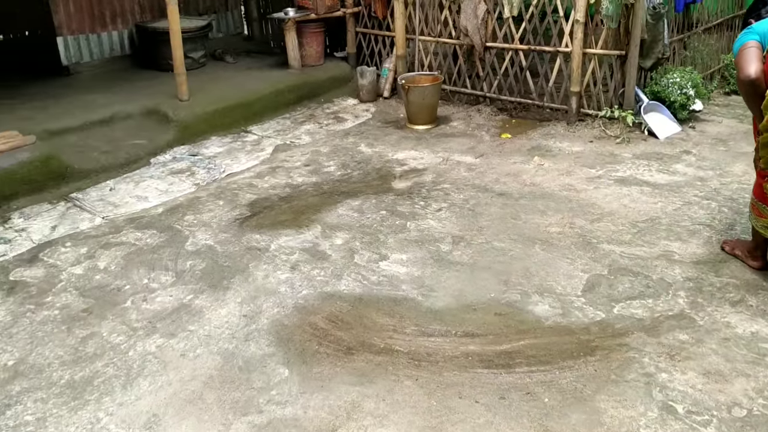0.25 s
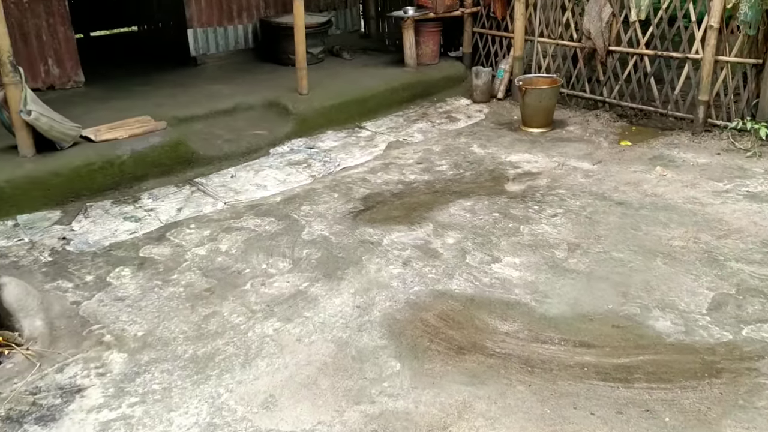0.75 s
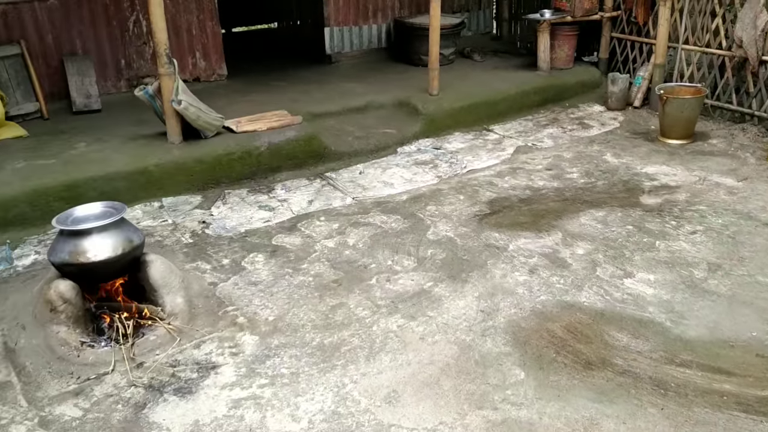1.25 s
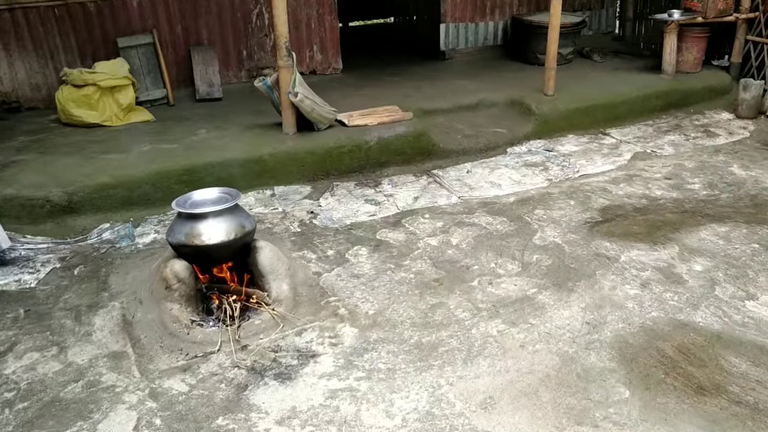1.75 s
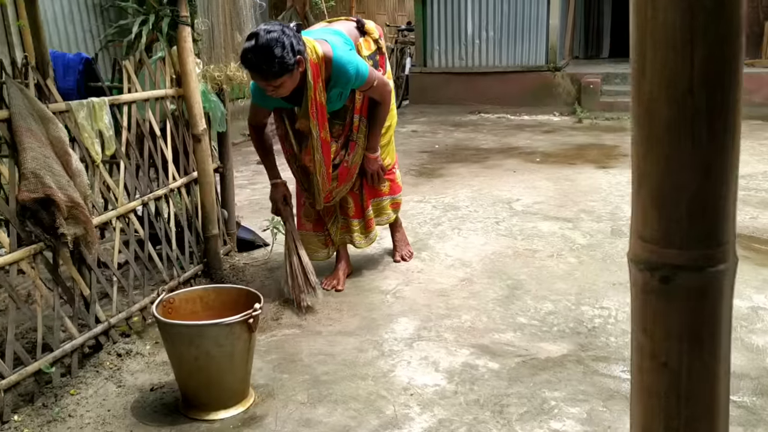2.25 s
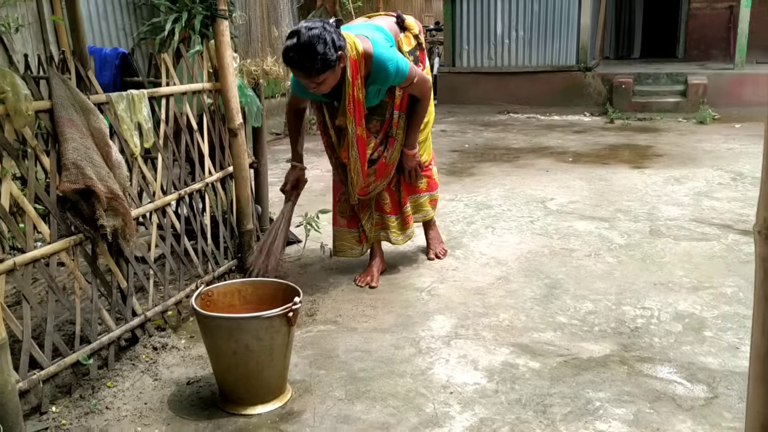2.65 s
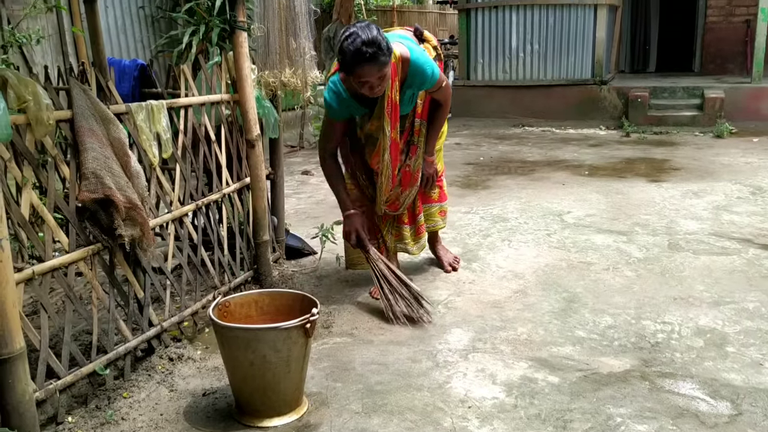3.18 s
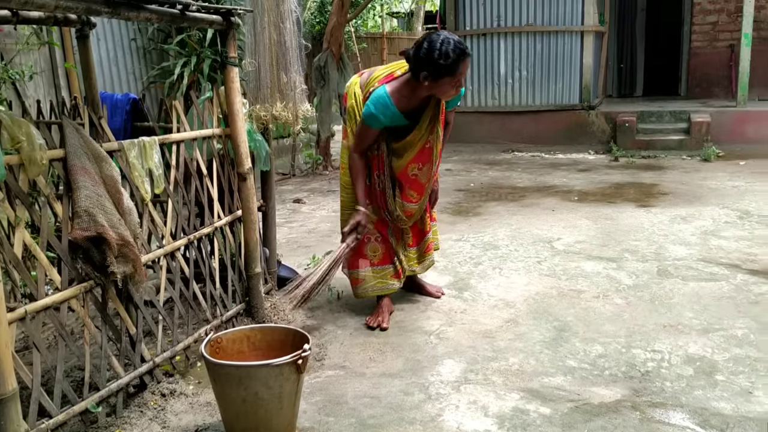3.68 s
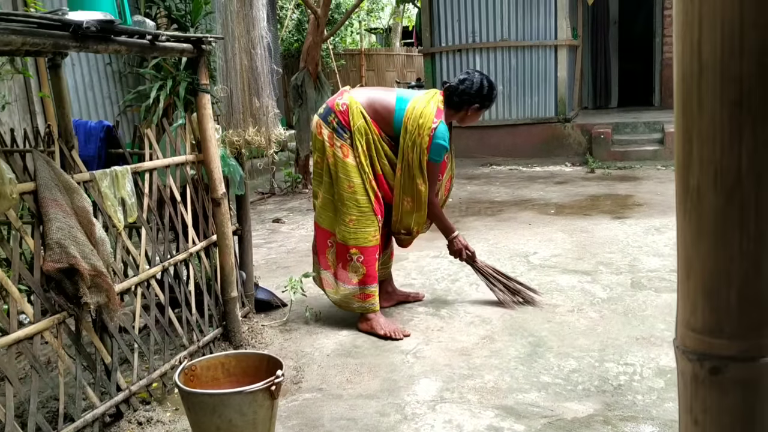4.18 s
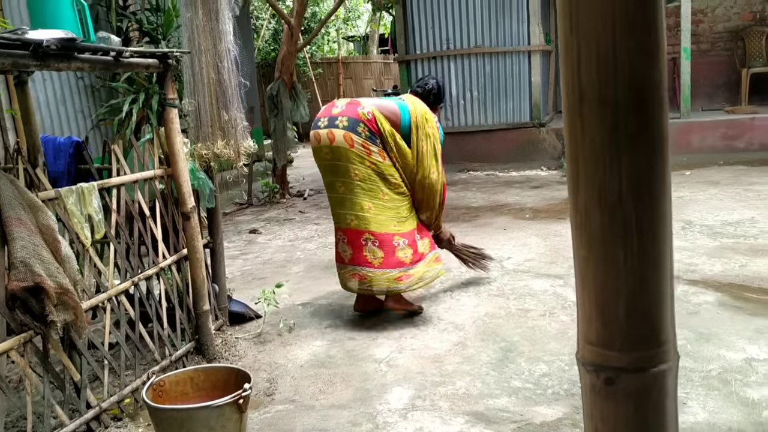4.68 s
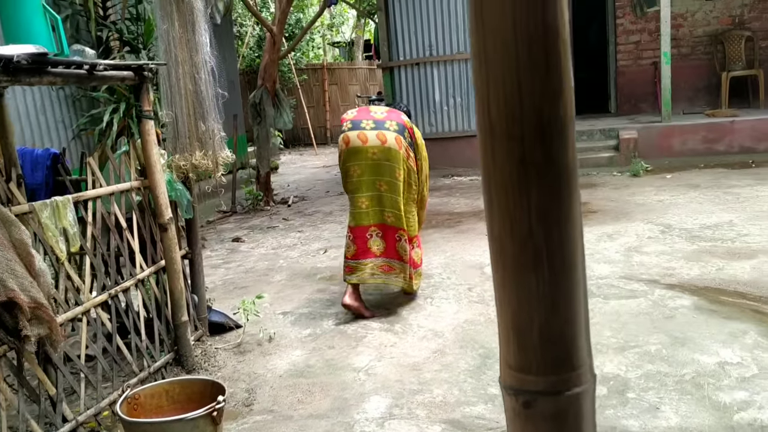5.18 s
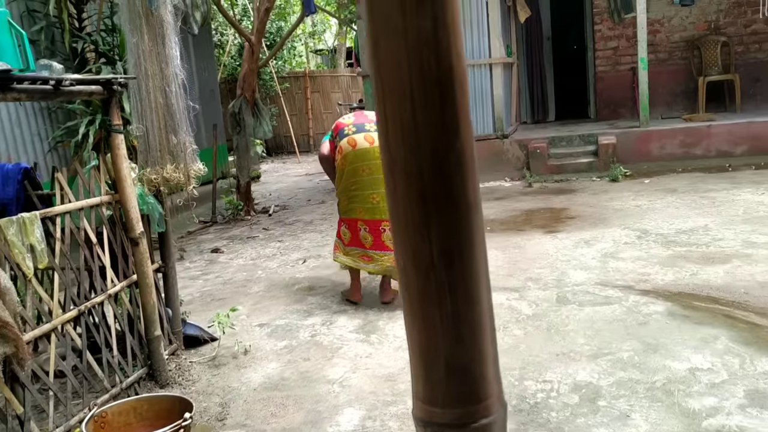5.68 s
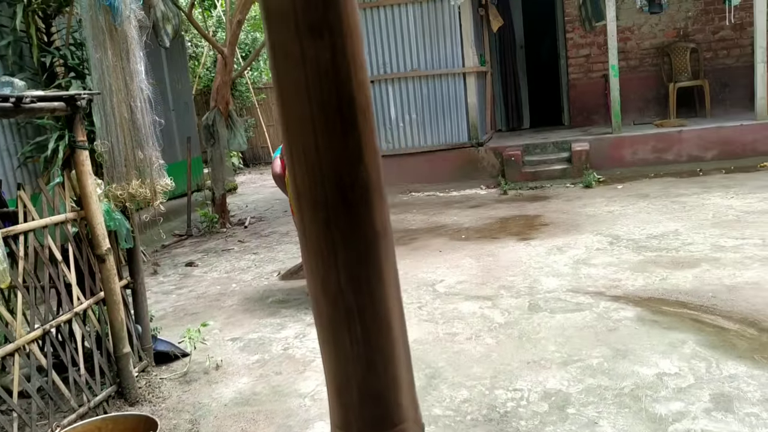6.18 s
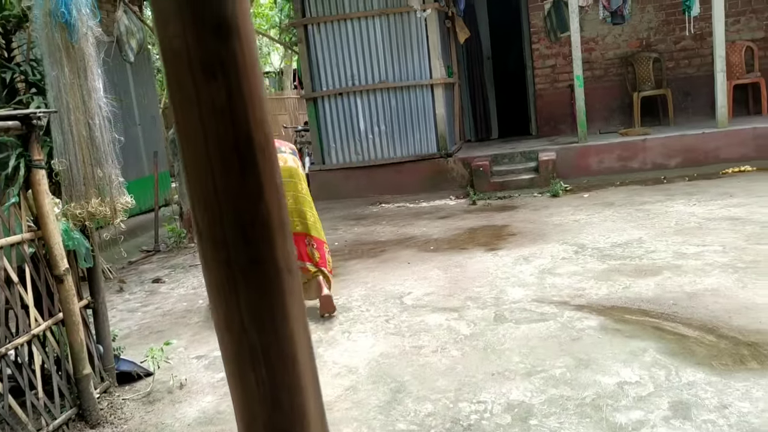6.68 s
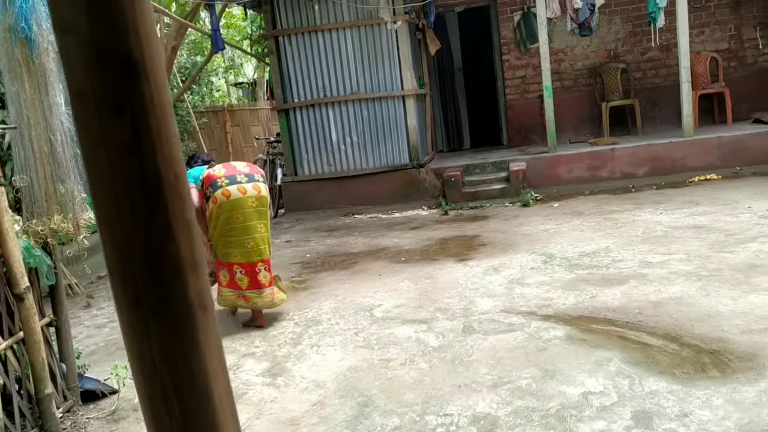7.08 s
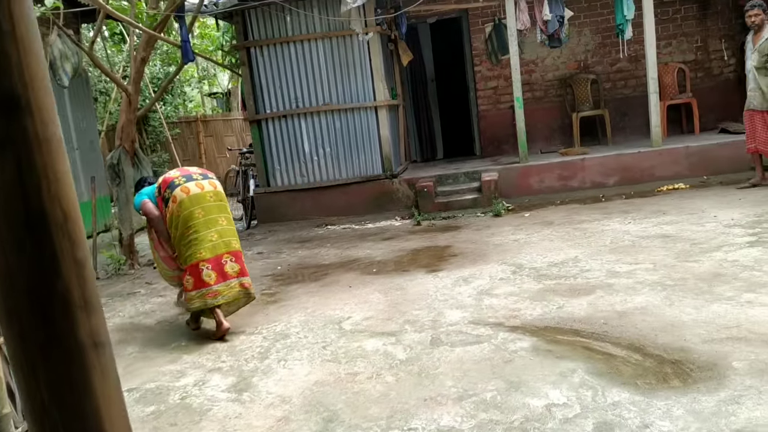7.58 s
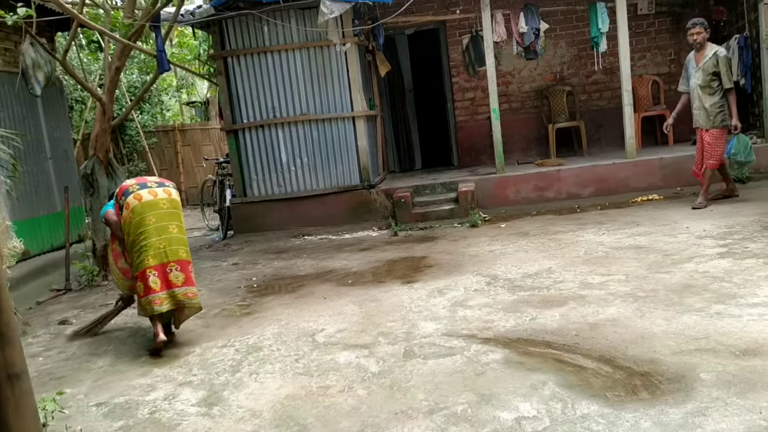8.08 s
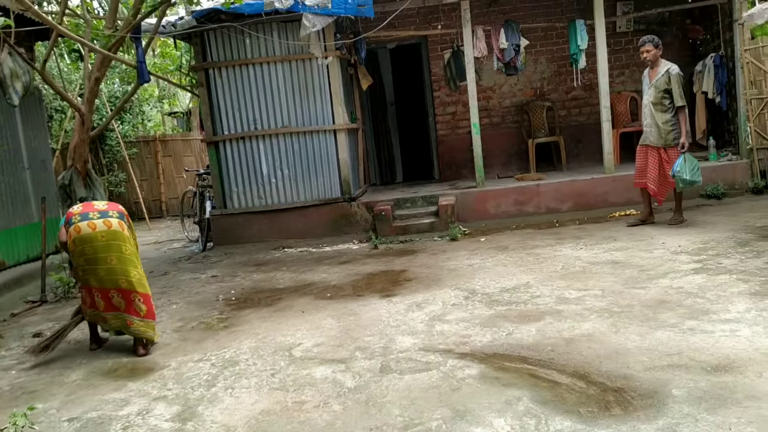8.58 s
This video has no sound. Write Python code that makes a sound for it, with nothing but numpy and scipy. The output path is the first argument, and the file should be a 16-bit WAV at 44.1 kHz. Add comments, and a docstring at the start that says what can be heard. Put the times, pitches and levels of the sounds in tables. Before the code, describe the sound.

Dry, scratchy swishes of a twig broom cross a gritty outdoor yard, heard in stereo from a few metres away, with occasional crisp snaps. Two quick pops from a cooking fire come first, then a distant wooden thud, one foot scrape and later another thud. A faint far motor rises in pitch at the close. Small birds, a thin insect buzz and a low village rumble sit quietly behind the sweeping.

```python
"""A short stick broom sweeps a hard village yard to and fro, a few metres from a hand-held phone with
two microphone ports. Its twig tips skip over grit in dense ticks that merge into a hiss, and twigs snap.
Birds chirp near and far, a cooking fire pops twice, something wooden thuds behind the houses and a foot
drags once. Late on, a far motor speeds up. Insects buzz thinly over a low village rumble throughout."""
import sys
import numpy as np
from scipy import signal
from scipy.fft import rfft, irfft, next_fast_len
from scipy.io import wavfile

SR = 44100
rng = np.random.default_rng(int(sys.argv[2]) if len(sys.argv) > 2 else 0)


def to_wav(sig):
    """Store sig (one row per channel, or 1-D mono) as 16-bit WAV at the path in sys.argv[1].

    Samples outside -1..1 are clipped; the rate is SR.
    """
    pcm = np.clip(np.atleast_2d(sig), -1, 1) * 32767
    pcm = np.round(pcm).astype(np.int16)
    wavfile.write(sys.argv[1], SR, pcm.T)  # frames by channels


N = 389826


def undb(db):
    return 10 ** (np.asarray(db) / 20)


def level(x, db):
    """Scale to an RMS level."""
    return x * undb(db) / np.sqrt(np.mean(x ** 2))


def curves(table):
    """Columns of a timed table as sample-by-sample lines."""
    times, *columns = np.transpose(table)
    return [np.interp(np.arange(N) / SR, times, column) for column in columns]


def ring(x, hz, width_hz):
    """Two-pole resonance, gain 1 at the centre."""
    return signal.lfilter(*signal.iirpeak(min(hz, .45 * SR), hz / width_hz, SR), x)


def walk(per_s):
    """Random levels joined by straight lines; spread near 1."""
    k = int(per_s * N / SR) + 2
    return 1.25 * np.interp(np.linspace(0, k - 1, N), np.arange(k), rng.standard_normal(k))


def colour(x, spectrum):
    """Shape the spectrum along straight lines on a log-frequency axis."""
    hz, db = np.transpose(spectrum)
    size = next_fast_len(N)
    gain_db = np.interp(np.log(np.fft.rfftfreq(size, 1 / SR) + 1), np.log(hz), db)
    return irfft(rfft(x, size) * undb(gain_db), size)[..., :N]


def add(out, s, sound, pan_db):
    """Mix a sound in at s seconds, pan_db louder at the left port than at the right."""
    i = int(s * SR)
    out[:, i:i + sound.shape[-1]] += sound[..., :N - i] * undb([[pan_db / 2], [-pan_db / 2]])


def yard(x, t60, wet_db, hold_s):
    """House fronts and fence return a diffuse tail that keeps changing, its bass alike at both ports."""
    t, hop = np.arange(int(t60 * SR)) / SR, int(hold_s * SR / 2)
    out = np.pad(x, ((0, 0), (0, 2 * hop + len(t))))
    fade = np.hanning(2 * hop)
    for i in range(-hop, N, hop):
        mid, side = rng.standard_normal((2, len(t))) * 1000. ** (-t / t60) * (t > .003)
        side = signal.lfilter(*signal.butter(1, 500, "high", fs=SR), side)
        tail = undb(wet_db) * np.array([mid + side, mid - side]) / np.sqrt(np.sum(mid ** 2 + side ** 2))
        a, b = max(i, 0), min(i + 2 * hop, N)
        out[:, a:b + len(t) - 1] += signal.fftconvolve(x[:, a:b] * fade[a - i:b - i], tail, axes=1)
    return out[:, :N]


def grit(per_s, spread_db, patchy_db):
    """Stick-slip ticks on the ground; each reaches the two ports from its own spot with its own lag."""
    # where the broom is: (time [s], lag of the left port behind the right [ms])
    bearing = [(0, -.27), (2.9, -.33), (3.2, .14), (5.5, .16), (8.84, .2)]
    when, spot, polarity, strength = rng.random((N // 4, 4))[:int(per_s * N / SR)].T
    at = when * (N - 60) + 30
    lag_ms = np.interp(at / SR, *np.transpose(bearing)) + .12 * (2 * spot - 1)
    half_lag = lag_ms * SR / 2000
    # many small slips, few large ones, none beyond what a twig can store
    size = np.sign(polarity - .5) * undb(spread_db * np.minimum(-np.log(1 - strength), 6.5))
    ticks = np.array([np.bincount((at + side * half_lag).astype(int), size, N) for side in (1, -1)])
    return ticks * undb(patchy_db * walk(90))


def stroke_speed(t, rise, hold, fall, touch_db, lean_db):
    """The bundle lands, speeds up, holds and lifts off; grit settles after it."""
    landing, start = np.clip(t / .004, 0, 1), undb(touch_db)
    speed_up = np.sin(np.pi / 2 * np.clip(t / max(rise, .002), 0, 1)) ** 2.38
    lean = undb(lean_db * np.clip((t - rise) / max(hold, .001), 0, 1))
    lifted = np.maximum(t - rise - hold, 0) / max(fall, .005)
    # the hiss drops 20 dB during lift-off, then settling grit fades more slowly
    fade = np.minimum(lifted ** 1.05, 1 + .7 * (lifted - 1))
    return landing * (start + (1 - start) * speed_up) * lean * 10 ** -fade


def broom():
    """A few metres off, tips hiss, twigs ring at shifting pitches and the bundle rasps on the ground."""
    # strokes and scuffs: (touch-down [s], speed-up [s], full speed [s], lift-off [s], tip hiss [dB],
    # touch-down against full speed [dB], lean during full speed [dB], twigs over hiss [dB],
    # rasp over hiss [dB], hiss left minus right [dB])
    strokes = [(-0.2, 0.15, 0.038, 0.13, -42, -17.5, 0.5, -10.5, -17.5, 3),
               (0.11, 0.045, 0.13, 0.1, -66, -6, -1.5, -5, -13, 5),
               (0.276, 0.064, 0.04, 0.12, -61.5, -9, -1, -9, -13, 8),
               (0.407, 0.17, 0.13, 0.13, -42.5, -15.5, -0.1, -12, -18.5, 1.3),
               (1.079, 0.031, 0.015, 0.073, -54.5, -6, -0.5, -12, -11, 1.5),
               (1.145, 0.2, 0.19, 0.16, -41, -12.5, -4.5, -13.5, -18, 1.5),
               (1.986, 0.19, 0.075, 0.095, -44.5, -5, -2, -15.5, -16.5, 1.5),
               (2.3, 0.03, 0.1, 0.12, -71, -1, -6, -2, -16, 2),
               (2.472, 0.12, 0.15, 0.3, -47, -12, 3.5, -14, -17, 1),
               (3.049, 0.032, 0.013, 0.051, -60.5, -10, 14, -11, -30, -5),
               (3.099, 0.068, 0.057, 0.067, -42.5, -6.5, 2, -12, -20, -2.4),
               (3.25, 0.024, 0.08, 0.1, -55, -8, -2, -7, -8.5, -1),
               (3.37, 0.015, 0.004, 0.039, -53, 3, 1, -12, -7.5, 1),
               (3.4, 0.024, 0.062, 0.17, -37, -16, 1.5, -13.5, -20.5, -2.5),
               (3.729, 0.49, 0.065, 0.093, -39.5, -18, -2, -13, -22, -4.5),
               (4.215, 0.018, 0.02, 0.13, -45.5, -12, -8, -20, -23, -0.5),
               (4.327, 0.033, 0.061, 0.12, -37, -17, 1, -15, -25.5, -2.5),
               (4.716, 0.23, 0.13, 0.14, -39, -19, -3.5, -14, -20, -2),
               (5.126, 0.0055, 0.002, 0.03, -51, -8.0, -0.5, -2, -2.5, -1.5),
               (5.41, 0.087, 0.089, 0.12, -44.5, -11, 1, -10.5, -15.5, -0.8),
               (5.83, 0.044, 0.011, 0.3, -53, -12.5, -0.5, -13, -17, -1),
               (5.938, 0.17, 0.034, 0.15, -38.5, -19, -3.5, -13, -13, -0.6),
               (6.445, 0.25, 0.046, 0.086, -38, -17, -2.2, -13, -17.5, -0.6),
               (6.794, 0.01, 0.003, 0.041, -50.5, -6.5, 0, -24, -27, 2.1),
               (6.903, 0.004, 0.004, 0.037, -58.5, -4, -1, 6, -11, 0),
               (7.071, 0.16, 0.14, 0.16, -40, -18.5, 1, -11.5, -17, -0.5),
               (7.48, 0.028, 0.0073, 0.15, -51, -5, -4, -9, -8, 1),
               (7.661, 0.026, 0.0098, 0.038, -58, -12, -7, -11, -15, 1.9),
               (7.748, 0.027, 0.031, 0.026, -54.5, -15.2, -2, -3, -23, 1),
               (7.809, 0.092, 0.22, 0.19, -38, -8.5, -2.5, -10.5, -19, -1),
               (7.99, 0.034, 0.15, 0.071, -38.5, -12, -2, -24, -18, 0.5),
               (8.487, 0.013, 0.0027, 0.08, -50.5, -21, -1.5, -8, -21, -2.7),
               (8.548, 0.1, 0.1, 0.1, -40.5, -10, -0.8, -12.5, -20.5, -1),
               (8.72, 0.13, 0.092, 0.055, -35.5, -9.5, 0, -12.5, -15, -0.5)]
    # spectrum of the fine tips: (frequency [Hz], gain [dB])
    tip_spectrum = [(3240, -16.5), (5500, -9), (7160, -1), (10900, 2.5), (14700, -1), (15500, 1.5)]
    # spectrum of the twig bodies: (frequency [Hz], gain [dB])
    twig_spectrum = [(1240, -21), (2100, -6.5), (3340, 4.5), (4450, 3.5), (5300, -5), (6500, -6),
                     (8450, 3.5), (14300, -120)]
    # spectrum of the ground rasp: (frequency [Hz], gain [dB])
    rasp_spectrum = [(410, -10.5), (700, -8.5), (843, -4), (1160, -6.5), (2400, 1.5), (3120, 0),
                     (5280, -120)]
    # loose twigs rustle between strokes
    hiss_power, twig_power, rasp_power = (undb(2 * (db + 3.5 * walk(14))) for db in (-70, -72, -72))
    t, hiss_power = np.arange(N) / SR, np.array([hiss_power, hiss_power])
    for s, rise, hold, fall, db, touch_db, lean_db, twig_db, rasp_db, pan_db in strokes:
        at = slice(max(int(s * SR), 0), int((s + 1.5) * SR))
        power = stroke_speed(t[at] - s, rise, hold, fall, touch_db, lean_db) ** 2
        hiss_power[:, at] += undb(2 * db + np.array([[pan_db], [-pan_db]])) * power
        # twigs and rasp follow speed less steeply than the hiss
        twig_power[at] += undb(2 * (db + twig_db)) * power ** .75
        rasp_power[at] += undb(2 * (db + rasp_db)) * power ** .83
    ticks = grit(per_s=9000, spread_db=1.4, patchy_db=.8)
    fine, body = colour(ticks, tip_spectrum), colour(ticks, twig_spectrum)
    # each twig rings at its own pitch while it touches down, so the colour keeps shifting
    tips = sum(undb(2.13 * walk(50)) * ring(fine, hz, hz / 14) for hz in np.geomspace(5000, 16000, 18))
    twigs = sum(undb(3 * walk(45)) * ring(body, hz, hz / 18) for hz in np.geomspace(2200, 6500, 20))
    rasp = level(colour(grit(per_s=2500, spread_db=2, patchy_db=1.5), rasp_spectrum), 0)
    rasp *= undb([[1.5], [-1.5]])  # the left port lies nearer the ground
    # single stiff twigs catch and let go
    flicks = ring(grit(per_s=500, spread_db=2.6, patchy_db=3), hz=9000, width_hz=9000)
    hiss = np.sqrt(hiss_power) * (level(tips, 0) + level(flicks, -15))
    return hiss + np.sqrt(twig_power) * level(twigs, 0) + np.sqrt(rasp_power) * rasp


def village():
    """The village all around: half-octave bands of noise flicker separately while the bass swells."""
    # spectrum of the background: (frequency [Hz], gain [dB])
    spectrum = [(12, -60), (20, 0), (72, 2.5), (282, -14), (465, -20.5), (857, -22), (1500, -28.5),
                (2610, -29), (4550, -56), (4950, -34), (7110, -30), (8170, -19), (9130, -29),
                (10800, -30.5), (15500, -36)]
    # swell of the low rumble, taken about its mean: (time [s], level [dB])
    rumble = [(0.0, -64), (2.04, -61.5), (2.58, -65), (3.42, -59.5), (5.34, -60), (5.96, -59.5),
              (6.28, -56.5), (6.75, -62), (7.04, -58.5), (7.31, -62), (7.98, -60), (8.84, -58)]
    mid, side = colour(rng.standard_normal((2, N)), spectrum)
    swell_db = curves(rumble)[0]
    swell_db -= swell_db.mean()
    out = 0
    for hz in 25 * 2 ** np.arange(0, 9.4, .5):
        # light wind stirs each port alone at the very bottom; the treble is diffuse
        apart = min(max(.18, 15 / hz, hz / 950), 1) * np.array([[1], [-1]])
        gain_db = 1.7 * walk(5.5) + swell_db * (hz < 160)
        out += undb(gain_db) * ring(mid + apart * side, hz, hz / 3)
    return level(out, -56)


def insects():
    """A thin, high buzz: a narrow band of noise that wavers in level."""
    band = signal.butter(3, [7520, 8330], "band", fs=SR, output="sos")
    buzz = signal.sosfilt(band, rng.standard_normal((2, N)))
    return undb(2.4 * walk(3)) * level(buzz, -70.5)


def bird_note(hz, rise, length_s, rasp_hz):
    """A gliding sine with soft edges, roughened by a fluttering throat."""
    progress = np.arange(int(length_s * SR)) / (length_s * SR)
    k = int(2 * rasp_hz * length_s) + 2
    flutter = np.interp(progress * (k - 1), np.arange(k), rng.standard_normal(k))
    clear_share = 1 / (1 + rasp_hz / 60)
    throat = level(clear_share + (1 - clear_share) * flutter, 0)
    phase = 2 * np.pi * np.cumsum(hz * (1 + rise * progress)) / SR
    return np.sin(np.pi * progress ** .57) * throat * np.sin(phase)


def birds():
    """Small birds chirp near and far; one far bird repeats a hollow note at a steady pace."""
    # chirps: (time [s], level [dB], start pitch [Hz], rise [share of start pitch], length [s],
    # rasp [Hz], left minus right [dB])
    chirps = [(0.118, -60.5, 3580, 0.0023, 0.21, 110, 12), (1.021, -58, 1595, 0.079, 0.014, 40, -1),
              (3.314, -57, 6720, -0.13, 0.085, 934, -12), (3.517, -53, 1337, .03, 0.018, 36, 4),
              (3.916, -62, 1697, 0.057, 0.018, 40, 2), (4.278, -47.5, 1409, 0.062, 0.017, 40, 11),
              (4.67, -57.5, 1307, 0.12, 0.012, 90, 10), (4.772, -61, 1850, .02, 0.021, 80, 8),
              (4.692, -64, 2920, 0.0078, 0.04, 854, 3), (4.921, -50, 3010, 0.041, 0.058, 1100, 6),
              (5.21, -62.5, 1680, 0.24, 0.045, 55, 16), (5.242, -57, 2196, 0.015, 0.042, 904, 7.5),
              (5.33, -65, 2100, 0.13, 0.094, 229, 6), (5.352, -63, 6950, -0.014, 0.081, 180, 0),
              (5.419, -54, 2500, 0.25, 0.028, 702, 8), (5.49, -65, 1650, 0.05, .02, 40, 4),
              (5.58, -59, 1360, 0.016, 0.017, 90, 2), (5.607, -60, 1383, 0.13, 0.025, 96, 11),
              (5.749, -61, 1230, .02, 0.012, 60, 4.5), (5.875, -65, 1830, 0.025, .025, 65, 17),
              (5.898, -53, 2440, 0.2, 0.029, 497, 7), (6.368, -54.5, 6340, 0.016, 0.14, 1100, -1),
              (6.811, -64.5, 3560, -0.053, 0.16, 260, 3.5), (6.936, -61, 6850, 0.027, .025, 250, 0),
              (7.55, -57.5, 2180, 0.029, 0.018, 90, 10), (7.695, -62.5, 3340, 0.015, 0.11, 200, 4),
              (8.303, -61, 2640, -0.012, 0.025, 170, 6), (8.337, -63.5, 3230, -0.0039, 0.15, 596, 2.5),
              (8.538, -65, 1610, 0.027, 0.025, 99, 6)]
    # bouts of the hollow note: (start [s], notes [count], level [dB])
    hoots = [(.3, 1, -68.5), (.59, 2, -72), (.917, 4, -67.5), (1.575, 4, -65.5), (2.235, 5, -72)]
    out, hoot_every_s = np.zeros((2, N)), .1645
    for s, db, hz, rise, length_s, rasp_hz, pan_db in chirps:
        add(out, s, undb(db) * bird_note(hz, rise, length_s, rasp_hz), pan_db)
    for s, notes, db in hoots:
        for k in range(notes):
            gain = undb(db + 1.3 * rng.standard_normal())
            hoot = bird_note(hz=735, rise=0, length_s=.083, rasp_hz=60)
            add(out, s + k * hoot_every_s, gain * hoot, pan_db=1.5)
    return out


def twig_snaps():
    """A sharp crack rings a few cycles, then grit scatters, unlike at each port."""
    # snaps: (time [s], crack peak [dB], ring [Hz], left minus right [dB])
    snaps = [(0.202, -45, 10000, 2.5), (0.297, -54, 12500, 2), (1.2714, -28, 10000, -1),
             (1.9905, -39, 10800, 0), (3.1012, -36, 12500, -5), (3.4184, -28, 10400, 1),
             (3.4953, -27, 14300, -6), (4.348, -28, 12500, -5), (5.1353, -38, 7960, -1),
             (6.457, -35.5, 12900, -6), (6.804, -40, 10300, 1), (6.908, -36.5, 3320, 5),
             (7.811, -36, 11300, -8), (8.495, -37, 7630, -4)]
    out, t = np.zeros((2, N)), np.arange(int(.08 * SR)) / SR
    for s, db, hz, pan_db in snaps:
        burst = np.exp(-t / .0003) * rng.standard_normal(len(t))
        crack = ring(ring(burst, hz, hz), hz, hz)
        scatter = ring(rng.standard_normal((2, len(t))) * np.exp(-t / .023), hz, .35 * hz)
        add(out, s, undb(db) * (crack / np.abs(crack).max() + undb(-6) * scatter), pan_db)
    return out


def cooking_fire():
    """A bursting pocket in the wood rings the ember's modes; near echoes and a brief sizzle follow."""
    # pops: (time [s], peak [dB], treble slope [dB/octave], low knock [dB], left minus right [dB])
    pops = [(1.9212, -27, -7, -14, 3), (1.9835, -13.5, 0, 1.5, 5)]
    # ember modes: (frequency [Hz], relative level [dB], t60 [s])
    ember = [(800, -32, .012), (1300, -31, .006), (1900, -32, .004), (3550, -20.5, .005), (5300, -20, .003),
             (7000, -15, .0025), (9700, 0, .0018), (12400, -6, .002), (14600, -10, .002)]
    out, t = np.zeros((2, N)), np.arange(int(.08 * SR)) / SR
    age = np.maximum(t - np.array([[.00017], [0]]), 0)  # the pop reaches the left port later
    for s, db, bright_db, low_db, pan_db in pops:
        modes = 0
        for k, (hz, mode_db, t60) in enumerate(ember):
            gain = undb(mode_db + low_db * (hz < 3000) + bright_db * np.log2(max(hz, 3500) / 4000))
            modes += (-1) ** k * gain * np.sin(2 * np.pi * hz * age) * 1000. ** (-age / t60)
        echoes = undb(-23) * rng.standard_normal((2, len(t))) * np.exp(-t / .002)
        echoes[:, 0] = 1  # direct sound
        pop = signal.fftconvolve(modes, echoes, axes=1)[:, :len(t)]
        sizzle = ring(rng.standard_normal((2, len(t))), hz=8400, width_hz=7800) * np.exp(-t / .036)
        add(out, s, undb(db) * pop / np.abs(pop).max() + undb(-43) * sizzle, pan_db)
    return out


def wooden_thuds():
    """Behind the houses a soft push sets dull wooden modes ringing; dense echoes carry it on."""
    # thuds: (time [s], level [dB], brightness [dB/octave], plank ring [dB], hollow ring [dB])
    thuds = [(2.29, -64.5, 2, -4, -29.5), (2.82, -62, 2, -3, -16), (3.281, -41.5, 2, -10.5, -32),
             (6.0483, -42.5, 1.5, -6, -6), (6.0676, -45.5, 0, 2, -11)]
    # wood modes: (frequency [Hz], relative level [dB], t60 [s])
    wood = [(116, -20, 0.03), (166, -4, 0.12), (213, 1, 0.044), (350, -9.5, 0.049), (457, -14, 0.029),
            (564, -16, 0.016), (680, -8.5, 0.018), (860, -12.5, 0.017), (980, -22, 0.011),
            (1330, -19.5, 0.013), (1680, -14.5, 0.015)]
    plank_hz, hollow_hz, echo_t60_s, echo_build_s = 262, 684, .4, .014
    out, t = np.zeros((2, N)), np.arange(int(.5 * SR)) / SR
    echo_envelope = undb(-21) * 1000. ** (-t / echo_t60_s) * (1 - np.exp(-t / echo_build_s))
    first_wave = np.hanning(int(.0036 * SR))  # bends round a house and loses its edge
    bass_cut = signal.butter(2, 130, "high", fs=SR)  # a small plank radiates little deep bass
    for s, db, bright_db, plank_db, hollow_db in thuds:
        mid, side = rng.standard_normal((2, len(t)))
        paths = np.array([mid + .29 * side, mid - .32 * side]) * echo_envelope
        paths[:, :len(first_wave)] = undb(10.5) * first_wave / first_wave.sum()
        modes = [(hz, mode_db + bright_db * np.log2(hz / 200), t60) for hz, mode_db, t60 in wood]
        modes += [(plank_hz, plank_db, .045), (hollow_hz, hollow_db, .055)]
        knock = sum(undb(mode_db) * np.sin(2 * np.pi * hz * t) * 1000. ** (-t / t60)
                    for hz, mode_db, t60 in modes)
        knock = signal.lfilter(*bass_cut, knock)
        thud = signal.fftconvolve(paths, knock[None], axes=1)[:, :len(t)]
        add(out, s, thud * undb(db) / thud[:, :SR // 10].std(), pan_db=.3)
    return out


def foot_drag():
    """A sole scrapes grit that rings in a few narrow, restless bands."""
    # course of the drag: (time [s], level [dB])
    course = [(3.71, -72), (3.765, -54), (3.86, -47), (3.93, -43), (4.0, -42.5), (4.075, -42), (4.11, -49),
              (4.19, -58), (4.24, -72)]
    # resonances of the grit: (frequency [Hz], width [Hz], relative level [dB])
    bands = [(2680, 350, -3), (3320, 550, 1.5), (4100, 450, 3), (4400, 400, 6), (5000, 700, 2),
             (4600, 2800, 3)]
    at = slice(int(course[0][0] * SR), int(course[-1][0] * SR))
    sand = grit(per_s=5200, spread_db=0, patchy_db=0)[:, at]
    scrape = sum(undb(db + 2 * walk(25)[at]) * ring(ring(sand, hz, width), hz, width)
                 for hz, width, db in bands)
    out = np.zeros((2, N))
    out[:, at] = undb(curves(course)[0][at]) * level(scrape, 0)
    return out


def motor():
    """A far engine speeds up, heard as two wavering partials of its firing rate."""
    # run-up: (time [s], firing rate [Hz], level [dB])
    run_up = [(7.4, 108, -72), (7.7, 117.9, -60), (8.1, 127.3, -65), (8.4, 139.9, -62.5),
              (8.84, 149.4, -67)]
    hz, db = curves(run_up)
    phase = 2 * np.pi * np.cumsum(hz * (1 + .03 * walk(25))) / SR
    fundamental = undb(db + 2.5 * walk(8)) * np.sin(phase)
    octave = undb(db - 11.5 + 2.5 * walk(8)) * np.sin(2 * phase)
    return fundamental + octave


def scene():
    """All that reaches the two ports; broom, foot and birds share the echoes of the yard."""
    sweeping = yard(broom() + foot_drag(), t60=.1, wet_db=-2.5, hold_s=.5)
    calls = yard(birds(), t60=.16, wet_db=-1, hold_s=.4)
    return sweeping + twig_snaps() + cooking_fire() + calls + wooden_thuds() + motor() + village() + insects()


def record(dry):
    """The phone cuts the top steeply above 15.7 kHz."""
    return signal.sosfilt(signal.ellip(10, .2, 70, 15700, fs=SR, output="sos"), dry)


dry = scene()
out = record(dry)
to_wav(out)
```